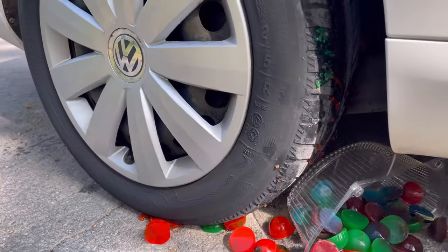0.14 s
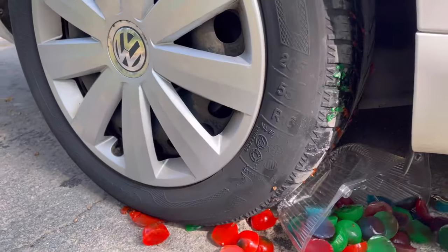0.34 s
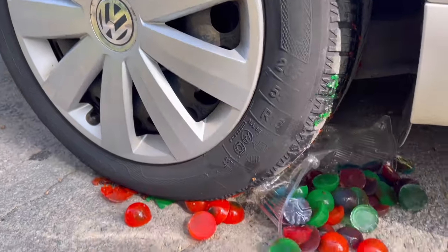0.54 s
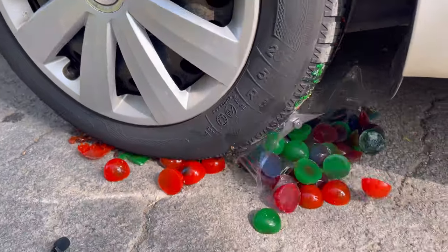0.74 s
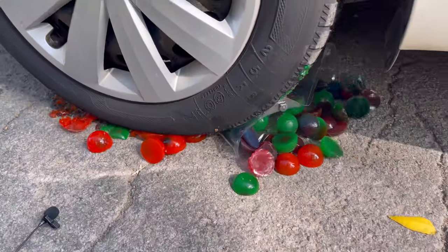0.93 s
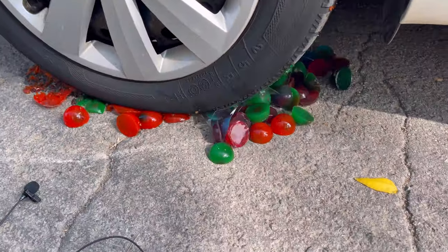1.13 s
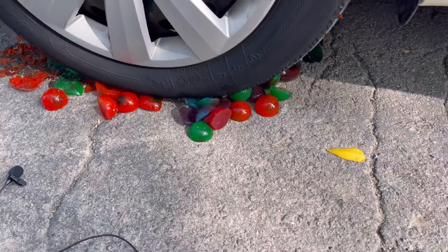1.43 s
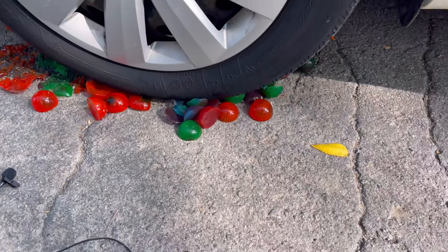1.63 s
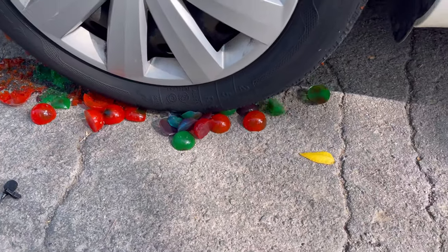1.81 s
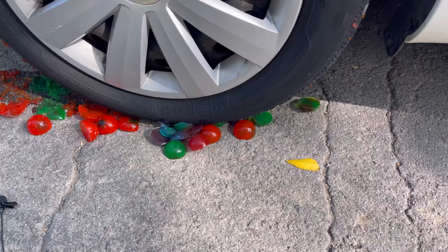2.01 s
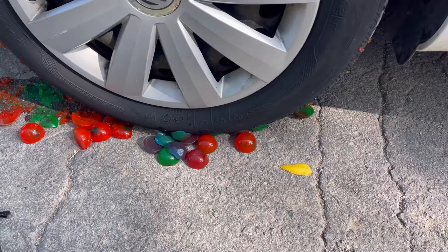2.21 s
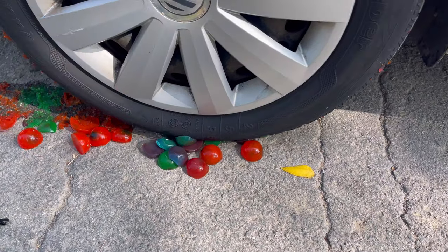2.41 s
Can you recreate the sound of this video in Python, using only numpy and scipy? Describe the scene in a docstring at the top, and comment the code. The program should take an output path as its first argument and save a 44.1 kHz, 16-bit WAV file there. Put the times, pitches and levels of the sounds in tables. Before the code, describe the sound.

A car tyre crushes small plastic jelly cups on pavement with loud dense cracks and pops.

```python
"""Tyre crushing jelly cups

A car tyre rolls slowly over a thin plastic tray of small jelly cups on asphalt, close to a clip-on microphone.
Walls snap as bursts of resonant noise and cups pop as sagging rings, over a bed of fine random crackle.
Trapped plastic creaks in stick-slip trains of ticks and rubs as a faint narrow hiss.
Soft slow thumps, filtered-noise rumble and outdoor hiss lie under it; the loudest peaks clip."""
import sys
import numpy as np
from scipy import signal
from scipy.fft import rfft, irfft
from scipy.io import wavfile
from scipy.ndimage import uniform_filter1d, map_coordinates

SR = 44100
rng = np.random.default_rng(int(sys.argv[2]) if len(sys.argv) > 2 else 0)


def wav_record(signal):
    """Record a signal, one row per channel, as 16-bit PCM in the file named by sys.argv[1]."""
    frames = np.transpose(np.atleast_2d(signal))
    bounded = np.clip(frames, -1, 1)
    # unit amplitude maps onto the largest positive 16-bit level
    quanta = np.round(bounded * 32767).astype(np.int16)
    wavfile.write(sys.argv[1], SR, quanta)


def gain_from_decibels(decibels):
    """Convert decibel values to linear amplitude factors."""
    exponent = np.asarray(decibels, float) / 20
    return 10 ** exponent


N = 112454  # length [samples]


def unit(x):
    """Bring each row to rms 1."""
    return x / np.sqrt(np.mean(x ** 2, axis=-1, keepdims=True) + 1e-20)


def curve(rows):
    """Draw straight lines through (time, value) points, one value per sample."""
    return np.interp(np.arange(N) / SR, *np.transpose(rows))


def wobble(rate):
    """A smooth random curve, rate knots a second."""
    knots = rng.standard_normal(int(N * rate / SR) + 4)
    return map_coordinates(knots, [np.arange(N) * rate / SR])


def coloured(x, points):
    """Shape x by a (Hz, dB) spectrum that closes steeply outside its ends, at rms 1."""
    hz, db = np.transpose(points)
    f = np.fft.rfftfreq(N, 1 / SR) + 1  # 1 Hz up, to keep the logarithm finite
    gain = gain_from_decibels(np.interp(np.log(f), np.log(hz), db, left=-90, right=-90))
    return unit(irfft(rfft(x) * gain, N))


def resonate(rows, hz, q):
    """Ring each row through its own causal band-pass resonance."""
    length = rows.shape[1]
    size = 2 * length
    f, centre = np.fft.rfftfreq(size, 1 / SR), np.reshape(hz, (-1, 1))
    damping = 1j * f * centre / q
    response = damping / (centre * centre - f * f + damping)
    return irfft(rfft(rows, size) * response, size)[:, :length]


def place(rows, times):
    """Sum the rows at their start times."""
    at = np.round(np.asarray(times) * SR).astype(int)[:, None] + np.arange(rows.shape[1])
    return np.bincount(at.ravel(), rows.ravel(), N + SR)[:N]


def fade(t, t60):
    """Exponential decay, 60 dB in t60 seconds."""
    return np.exp(-np.log(1000) * t / t60)


# Brittle snaps of the plastic: (time [s], level before the common trim [dB], brightest pitch [Hz])
SNAP_HITS = [(0.1513, -12.5, 4800), (0.2711, 0, 6760), (.318, -10.5, 8000), (0.3481, 3, 7740),
             (.4278, 6.5, 8300), (0.5121, 13, 7100), (0.5213, 8.5, 1980), (0.5445, 1.5, 6100),
             (0.5608, 8, 3470), (0.6471, 1.5, 7060), (0.6696, 0, 3200), (0.678, 9.5, 5100),
             (.687, 10, 4460), (0.7897, -0.5, 5100), (0.83, -5, 3950), (.836, 0.5, 2750),
             (0.8401, -1.5, 8050), (0.856, 5.5, 3700), (0.8774, -5, 3050), (0.8844, 3.5, 7100),
             (.91, 0, 3400), (0.9278, -0.5, 6000), (0.971, 1, 4600), (1.0012, -6, 6000), (1.005, -4, 3500),
             (1.01, 3, 8440), (1.0311, 0, 2200), (1.045, 4.5, 7000), (1.0613, 3.5, 2980), (1.0729, 6, 4070),
             (1.132, -2, 5030), (1.1453, -0.5, 4500), (1.2044, -4, 5700), (1.2515, -4, 8800),
             (1.2595, -8, 8900), (1.2848, -3, 4170), (1.2972, -7, 7860), (1.318, -9.5, 4600),
             (1.3813, -10.5, 8800), (1.438, -0.5, 3100), (1.897, -16.5, 2020), (1.9724, -24, 1800),
             (1.992, -17, 1880), (2.0056, -12, 1480), (2.018, -16, 6530), (2.0872, -14.5, 9600),
             (2.1374, -6.5, 11100), (2.1572, -11.5, 4670), (2.1739, -3.5, 8600), (2.1993, -9, 7350),
             (2.2255, -9, 9350), (2.2333, -9.5, 5000), (2.263, -4, 6200), (2.307, -5, 5000),
             (2.324, -14, 6000), (2.3956, -9, 7400), (2.4389, -9, 3770), (2.4653, -8.5, 7400)]
SNAP_T60_S, SNAP_TAIL_T60_S = 0.0056, 0.037
SNAP_TAIL_DB, SNAP_TRIM_DB = -13.5, -7


def snaps():
    """A sharp broad crack, brightest at a pitch of its own, with a duller tail of shards."""
    s, db, hz = np.transpose(SNAP_HITS)
    t = np.arange(2048) / SR
    white = rng.standard_normal((len(s), len(t)))
    broad = resonate(white, 8600, 0.2)
    pitched = unit(resonate(broad, hz, 4.0))
    brightness = 0.27 * (hz / hz.mean())[:, None]  # higher snaps carry more broad noise
    crack = unit(pitched + brightness * unit(broad))
    crack = crack * (fade(t, SNAP_T60_S) + fade(t, 0.00063))
    flutter = gain_from_decibels(6.1 * unit(uniform_filter1d(rng.standard_normal(white.shape), size=40)))
    shards = unit(resonate(broad, 0.78 * hz, 1.0)) * flutter
    tail = shards * gain_from_decibels(SNAP_TAIL_DB) * fade(t, SNAP_TAIL_T60_S)
    return place((crack + tail) * gain_from_decibels(db + SNAP_TRIM_DB)[:, None], s)


# Cups and tray panels buckling:
# (time [s], level before the common trim [dB], ring pitch [Hz], time the ring takes to decay by 11 dB [ms])
POP_HITS = [(0.2342, -13, 1170, 9.5), (0.282, -9.5, 1070, 13), (0.329, -12.5, 1660, 5),
            (0.3384, -6, 2280, 4.4), (0.3503, -8, 2440, 9.5), (0.381, -12.5, 1336, 13.5),
            (0.4115, -5.5, 2390, 4), (0.4275, -5, 2110, 4), (0.468, -10.5, 1900, 4.5),
            (0.4732, -6.5, 1310, 5.5), (0.4939, -5.5, 750, 2.5), (0.5124, -5, 1012, 7),
            (0.535, -22, 694, 30), (0.5601, -5, 1764, 16), (0.599, -11.5, 2140, 5.5), (0.629, -3, 1321, 6),
            (0.6575, -11, 1540, 8.5), (0.6774, -3.5, 1322, 3.5), (0.6887, -1, 1850, 6),
            (0.6985, -14.5, 800, 3.5), (0.742, 2, 2060, 2), (0.754, 0, 1816, 11.5),
            (0.8157, -7.5, 1900, 2.5), (0.958, -12, 1510, 6), (0.9767, -9, 2130, 5),
            (1.0293, -13.5, 1930.0, 11), (1.0725, -11, 2530, 8), (1.1088, -16.5, 2850, 3),
            (1.1282, -18, 1500, 17), (1.1802, -8, 1670, 8.5), (1.244, -4.5, 1770, 9.5),
            (1.2917, -15, 2120, 6.5), (1.4199, -11, 1250, 8), (1.4563, -14, 2030, 14),
            (1.477, -14, 3620, 9), (1.52, -19.5, 2400, 7.5), (1.5303, -14, 990, 10.5),
            (1.5452, -18, 1960, 6.6), (1.5631, -21, 1450, 6), (1.627, -26.5, 2830, 15),
            (1.6438, -21, 2010, 12.5), (1.811, -33, 970, 14), (1.8395, -27.5, 1170, 10),
            (1.9523, -24.5, 984, 31), (2.256, -23.5, 3220, 16)]
POP_RISE_S, POP_TAIL_T60_S = 0.00033, 0.087  # rise time constant, tail decay
POP_TAIL_DB, POP_TRIM_DB = -14.5, -1.85
POP_Q, SAG = 1.7, 0.11  # the ring falls from 11% above its pitch to 11% below
HOLLOW_HZ, HOLLOW_DB, HOLLOW_GROWS = 570, 1, 0.47  # tray cavity: typical pitch, level, dB per dB of pop


def pops():
    """A buckling wall: a sagging ring, rough noise around it and a cavity note."""
    s, db, hz, ms = (column[:, None] for column in np.transpose(POP_HITS))
    t = np.arange(4096) / SR
    life = ms / 1000
    draw = rng.random((len(s), 2))
    sagging_time = (1 - SAG) * t + SAG * life * (1 - np.exp(-2 * t / life))
    ring = np.sin(2 * np.pi * (hz * sagging_time + draw[:, :1]))  # random starting phase

    white = rng.standard_normal((2, len(s), len(t)))
    near = unit(resonate(resonate(white[0], hz, POP_Q), hz, 0.47))
    above = unit(resonate(resonate(white[1], 1.8 * hz, 1.4), hz, 0.23))
    jerks = gain_from_decibels(3.2 * unit(uniform_filter1d(rng.standard_normal(near.shape), size=60)))
    rough = (near + 0.63 * above) * jerks  # the wall gives in jerks

    cavity_hz = HOLLOW_HZ * gain_from_decibels(5.9 * (draw[:, 1:] - 0.5))
    hollow = unit(resonate(resonate(white[1], cavity_hz, 1.9), cavity_hz, 0.11))

    main = gain_from_decibels(-11 * (t / life) ** 2.38)
    tail = gain_from_decibels(POP_TAIL_DB) * fade(t, POP_TAIL_T60_S)
    big = np.minimum(HOLLOW_HZ / hz, 1)  # large panels ring clearer and boom more
    boom = big * gain_from_decibels(HOLLOW_DB + HOLLOW_GROWS * db) * hollow * (gain_from_decibels(-8 * t / life) + 2.83 * tail)
    split = 1.8 * white[0] * fade(t, 0.0031)  # the first split of the wall
    sound = 0.75 * np.sqrt(big) * ring * main + 0.59 * rough * (main + tail) + boom + split
    rise = 1 - np.exp(-t / POP_RISE_S)
    return place(sound * rise * gain_from_decibels(db + POP_TRIM_DB), s[:, 0])


# Crushing bed, before its flutter: (time [s], level [dB])
CRUSH_LEVEL = [(.16, -76), (.2, -39), (.8, -29), (1.05, -28.5), (1.3, -35.5), (1.5, -31), (1.575, -43),
               (1.78, -48), (1.88, -37.5), (2.05, -38.5), (2.25, -29.5), (2.34, -36.5), (2.45, -31),
               (2.55, -40)]
# Tone of the bed: (frequency [Hz], relative level per Hz [dB])
CRUSH_TONE = [(150, -6.5), (900, 4), (2200, 2.5), (6000, -6.5), (16000, -15.5)]
# Pitch around which the fine cracks scatter: (time [s], pitch [Hz])
GRAIN_PITCH = [(1.2, 5600), (1.45, 4900), (2.1, 8300)]
GRAINS_PER_S, GRAIN_SPREAD_DB, SQUISH_DB = 1000, 7, -5


def crush():
    """Random small cracks of very unequal size and pitch, over wet squishing noise, in a fluttering bed."""
    count, t = int(GRAINS_PER_S * N / SR), np.arange(400) / SR
    draw = rng.random((count, 3))
    size = gain_from_decibels(GRAIN_SPREAD_DB * np.minimum(-np.log(draw[:, :1] + 1e-9), 3))  # few large, many small
    times = draw[:, 2] * N / SR
    hz = np.interp(times, *np.transpose(GRAIN_PITCH)) * gain_from_decibels(9.5 - 20.9 * draw[:, 1])
    bursts = rng.standard_normal((count, len(t))) * fade(t, 0.0067)
    cracks = unit(place(unit(resonate(bursts, hz, 1.03)) * size, times))
    squish = gain_from_decibels(SQUISH_DB + 1.2 * wobble(72)) * rng.standard_normal(N)
    level = gain_from_decibels(curve(CRUSH_LEVEL) + 2.55 * wobble(40.11))
    return level * coloured(cracks + squish, CRUSH_TONE)


# Stick-slip creaks:
# (start [s], length [s], slip rate [slips per s], typical tick peak [dB], tick resonance [Hz])
CREAK_TRAINS = [(1.2, 0.11, 450, -31, 4212), (2.33, 0.089, 230, -22.5, 4470), (2.472, .075, 340, -26, 2820)]


def creaks():
    """Trapped plastic slips at a nearly steady rate, one tiny tick a slip."""
    out, t = np.zeros(N), np.arange(128) / SR
    for start, length, rate, db, hz in CREAK_TRAINS:
        count = int(length * rate)
        draw = rng.standard_normal((count, 2))  # unevenness of level and timing
        ticks = resonate(rng.standard_normal((count, len(t))) * fade(t, 0.0025), hz, 0.98)
        ticks = ticks / np.abs(ticks).max(axis=1, keepdims=True) * gain_from_decibels(db + draw[:, :1])
        out += place(ticks, start + (np.arange(count) + 0.049 * draw[:, 1]) / rate)
    return out


# Soft low pushes of air on the microphone: (middle [s], peak level [dB], frequency [Hz])
THUMP_HITS = [(1.9, -28, 74), (2.01, -24, 22), (2.2, -28, 32)]


def thumps():
    """About one slow cycle of pressure under a bell-shaped swell."""
    t = np.arange(N) / SR
    out = np.zeros(N)
    for middle, db, hz in THUMP_HITS:
        swell = gain_from_decibels(db - 7.4 * ((t - middle) * hz * 2) ** 2)
        out += swell * np.cos(2 * np.pi * hz * (t - middle))
    return out


def squeak():
    """Rubbing plastic: noise through a sharp resonance, a faint narrow hiss of wavering level."""
    start_s, end_s, pitch_hz, level_db = 1.61, 2.03, 6900, -53.5
    t = np.arange(N) / SR
    gate = (t > start_s) * (t < end_s)
    hiss = unit(resonate(rng.standard_normal((1, N)), pitch_hz, 25)[0])
    return gate * gain_from_decibels(level_db + 3.7 * wobble(15)) * hiss


# Low rumble, before its wobble: (time [s], level [dB])
RUMBLE_LEVEL = [(0, -51), (.5, -35.5), (1.4, -50.5), (1.75, -49.5), (1.88, -39.5), (2.2, -41.5),
                (2.35, -48)]
# Tone of the rumble: (frequency [Hz], relative level per Hz [dB])
RUMBLE_TONE = [(20, -10.5), (160, -10), (400, -23.5)]


def rumble():
    """Low filtered noise with a lumpy level."""
    level = gain_from_decibels(curve(RUMBLE_LEVEL) + 2.3 * wobble(12))
    return level * coloured(rng.standard_normal(N), RUMBLE_TONE)


# Tone of the outdoor hiss: (frequency [Hz], relative level per Hz [dB])
AIR_TONE = [(150, -5.5), (1000, -7), (5000, -12), (16000, -15.5)]


def outdoor_hiss():
    """Broad filtered noise wavering around a constant level of -49 dB."""
    return gain_from_decibels(-49 + 2.6 * wobble(31.2)) * coloured(rng.standard_normal(N), AIR_TONE)


def scene():
    """Everything at one close microphone."""
    plastic = snaps() + pops() + crush() + creaks()
    return (plastic + thumps() + squeak() + rumble() + outdoor_hiss())[None]


def roll_off(x):
    """The treble ends steeply here."""
    return signal.sosfilt(signal.butter(12, 16440, fs=SR, output="sos"), x)


def record(dry):
    """The recorder limits the band to 15.6 kHz and clips at full scale."""
    band = signal.sosfiltfilt(signal.butter(12, 15600, fs=SR, output="sos"), dry)
    mix = np.clip(band, -1, 1)
    return roll_off(mix)


dry = scene()
out = record(dry)
wav_record(out)
```